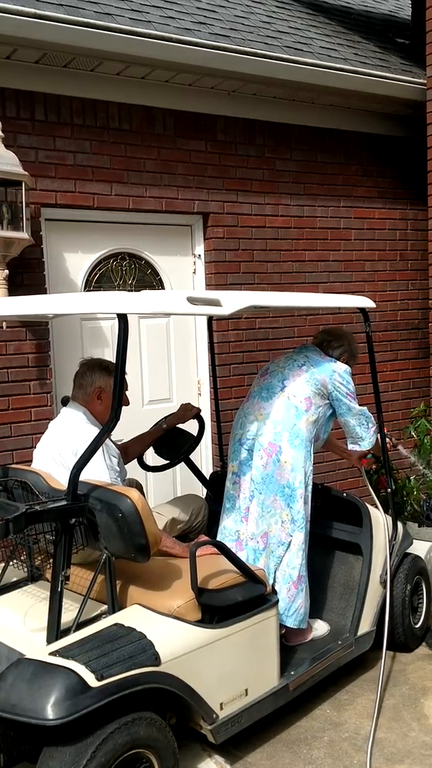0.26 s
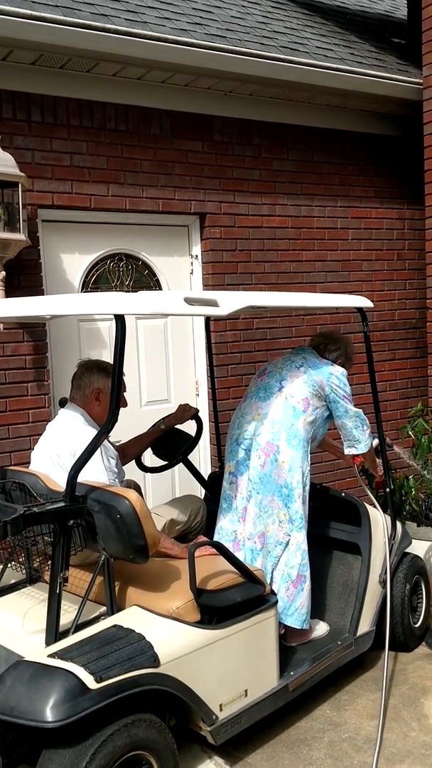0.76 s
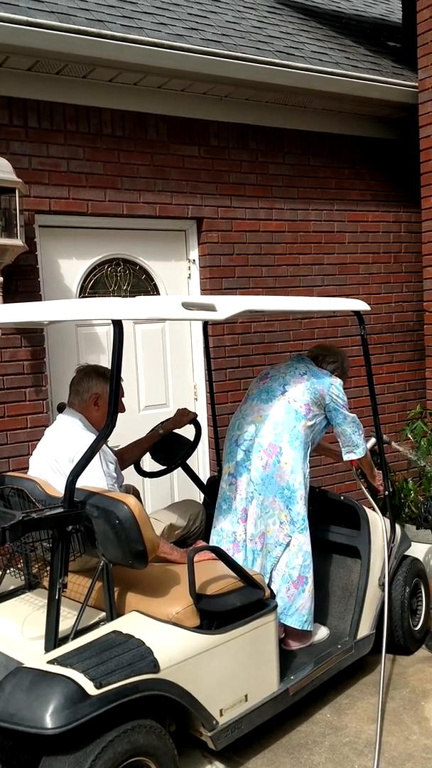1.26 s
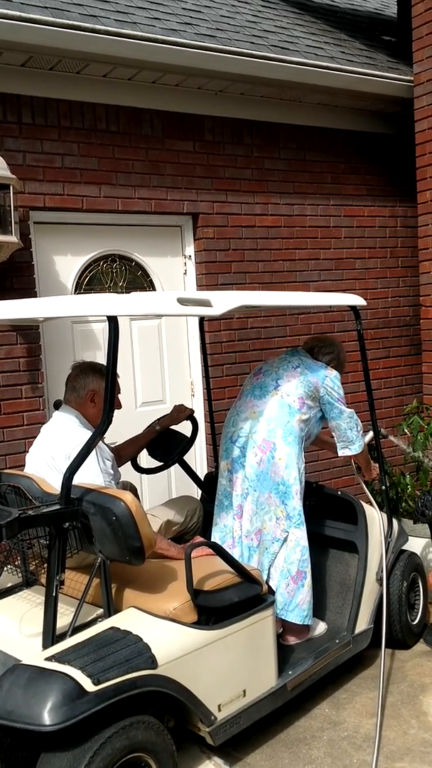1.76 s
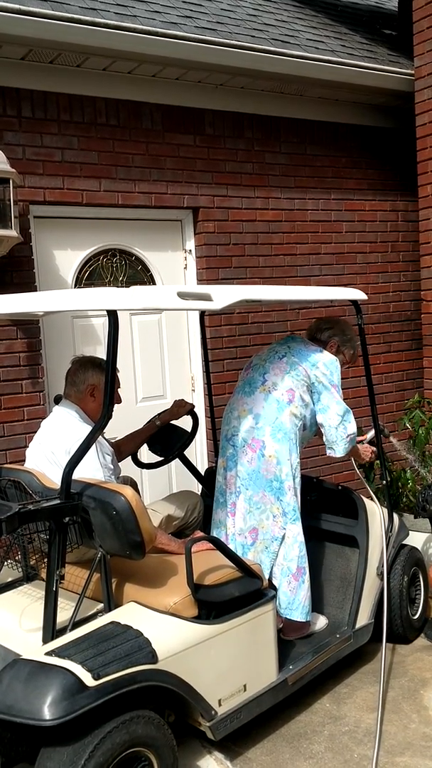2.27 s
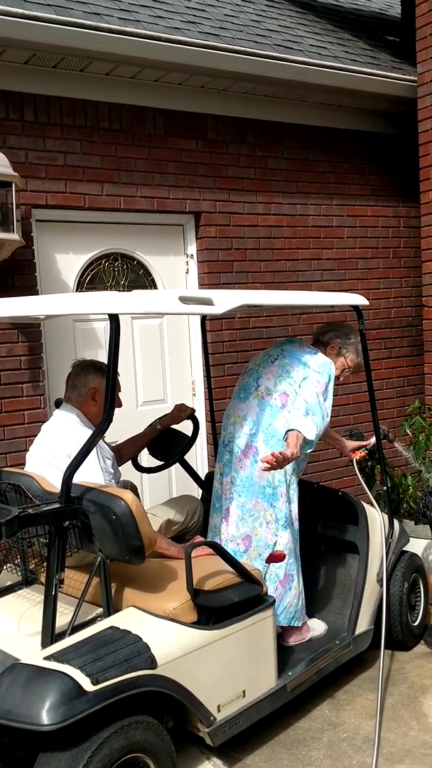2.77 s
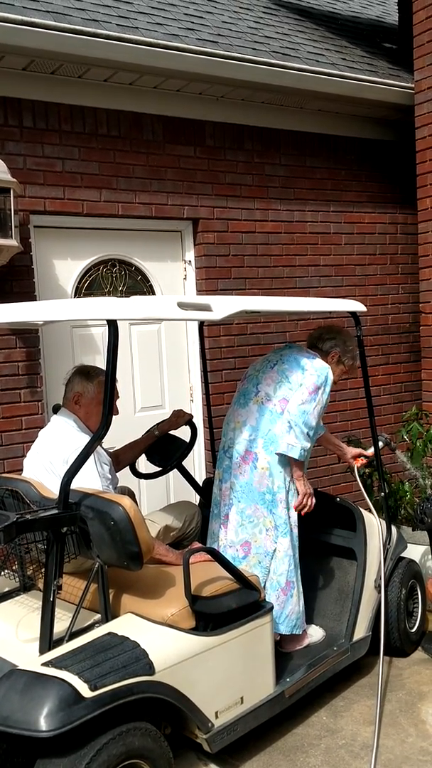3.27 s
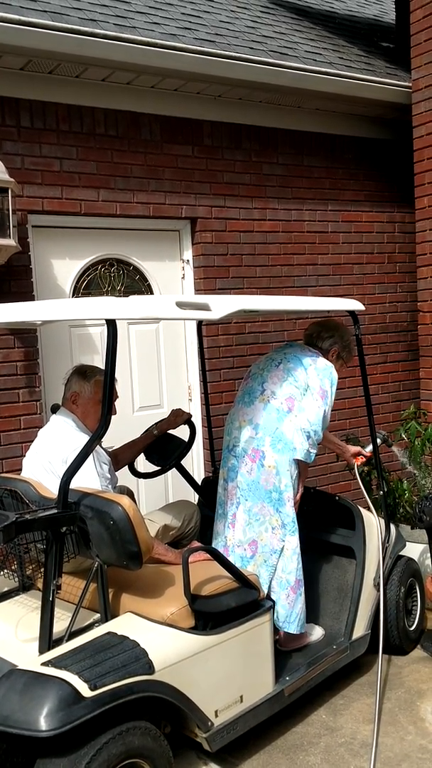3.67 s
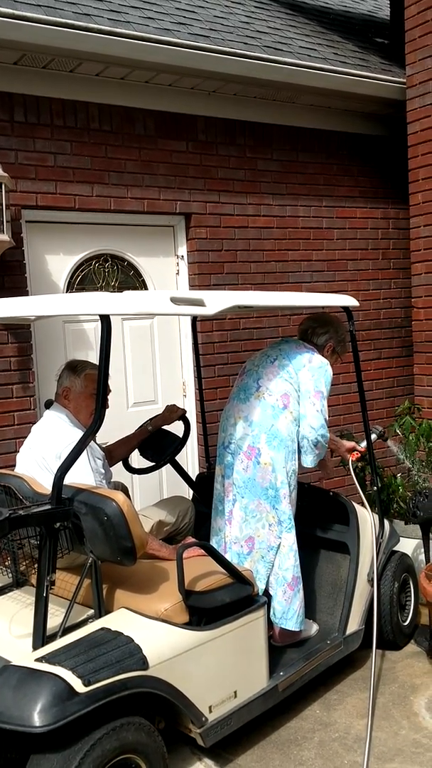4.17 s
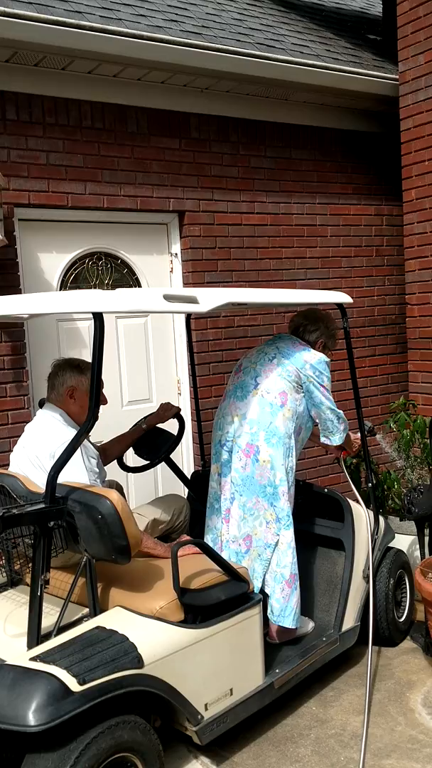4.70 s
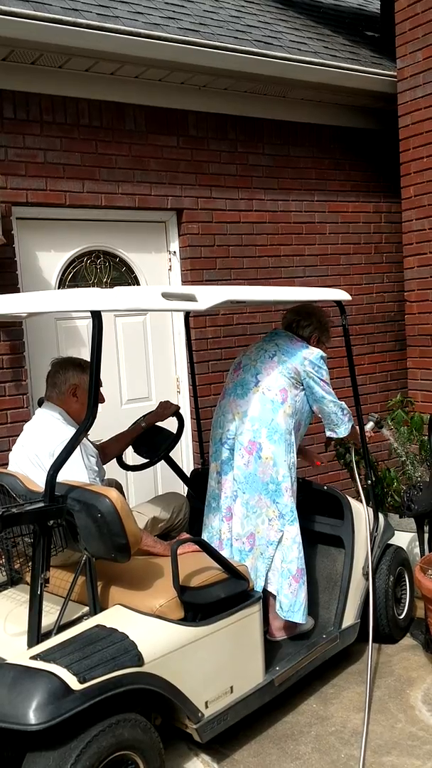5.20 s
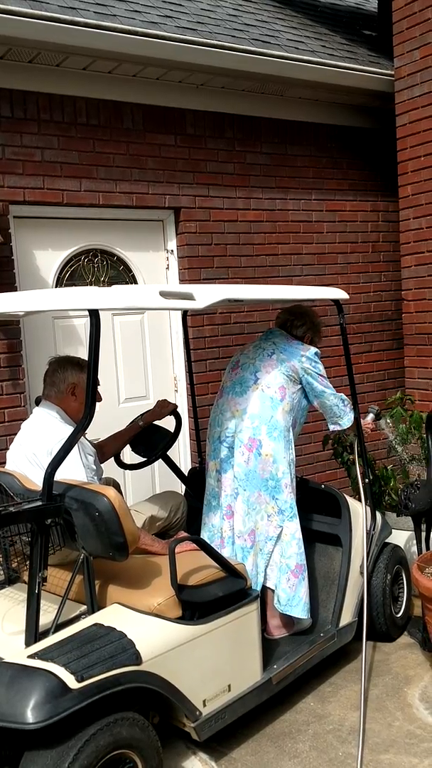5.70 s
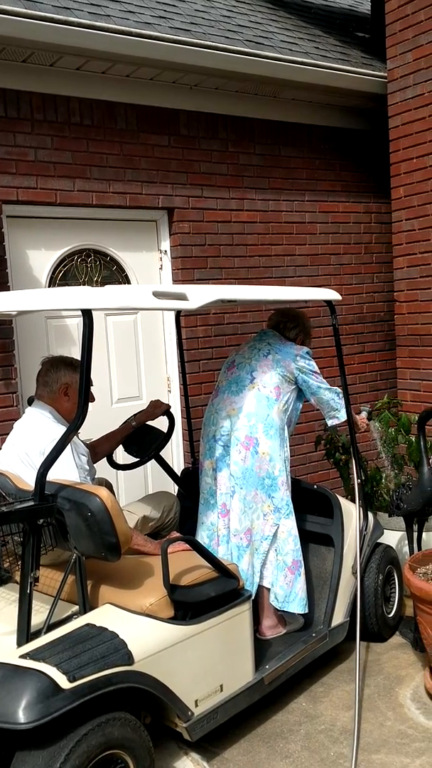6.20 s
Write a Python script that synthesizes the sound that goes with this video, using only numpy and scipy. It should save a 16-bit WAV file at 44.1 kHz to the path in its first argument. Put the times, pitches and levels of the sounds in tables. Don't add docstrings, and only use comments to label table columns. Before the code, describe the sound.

Steady bright water spray patters on potted plants outdoors, with low wind buffeting, scattered plops and ticks, and faint distant rumble.

```python
import sys
import numpy as np
from scipy import signal
from scipy.fft import rfft, irfft, next_fast_len
from scipy.io import wavfile
from scipy.ndimage import uniform_filter1d

SR = 44100
rng = np.random.default_rng(int(sys.argv[2]) if len(sys.argv) > 2 else 0)


def boost(x):
    u = np.asarray(x, float) / 20
    return 10 ** u


def master_out(mix):
    frames = np.transpose(np.atleast_2d(mix))
    ceiling = np.clip(frames, -1, 1)
    pcm = np.round(ceiling * 32767).astype(np.int16)
    wavfile.write(sys.argv[1], SR, pcm)


N = 284445
T = np.arange(N) / SR
PAD = next_fast_len(N + 4096)
HZ = np.arange(PAD // 2 + 1) * SR / PAD
CALM_DB = -66


def spray():
    # start_s, pot_and_soil_db, leaves_db
    jet = [(0, -46.5, -48), (.6, -45.5, -47), (1.15, -45.5, -48), (1.6, -46.5, -50), (1.92, -48.5, -51.5),
           (2.1, -43.5, -49), (2.3, -44, -46.5), (2.7, -46, -48), (3.0, -44.5, -45), (3.55, -45, -47.5),
           (3.9, -44.5, -48.5), (4.3, -44, -47), (4.8, -43.5, -47.5), (5.08, -44, -49), (5.55, -43.5, -49),
           (5.95, -40.5, -47.5), (6.12, -44.5, -47.5), (6.45, -43, -45.5)]
    # start_s, level_db
    flow = [(0.0, -37), (0.02, -37.5), (1.74, -36.5), (2.77, -37), (3.95, -37), (4.17, -38), (4.72, -36.5),
            (5.1, -37), (5.12, -36), (5.39, -37), (6.31, -37), (6.45, -35.5)]
    # freq_hz, left_db, right_db, likeness_0_1
    soil_colour = [(245, 3, 4.5, 1), (447, -3.5, -4.5, 1), (677, 5.5, 3.5, 0.96), (882, 10.5, 4.5, 0.72),
                   (1005, 3, 6, 1), (1450, -6.5, 9, 0.45), (2370, -9, 8, 0), (2750, -3, -6.5, 1),
                   (4320, -27, -23, 0.6)]
    ring_colour = [(500, -2, 1, 0.74), (880, -9.5, -10.5, 0.9), (1500, -7, 0.5, 0.83), (3200, -6.5, -7, 1),
                   (6000, -7.5, -1.5, 0.54), (10500, 3, -7, 0.8)]
    leaf_colour = [(1753, -13, 5.5, 0.18), (2220, 1.5, 8.5, 0.61), (3040, 3.5, 4.5, 0.53),
                   (4130, 6, 9.5, 0.35), (5420, -14, 2.5, 0.14), (6820, 10.5, -9.5, 0.24),
                   (8100, -17, -30, .2)]
    nozzle_colour = [(4470, -21, -14.5, 0.13), (6630, -15.5, -5.5, 0.3), (7240, -7, -4, 0.14),
                     (8880, -4, 1, 0.68), (10300, -5.5, 1.5, 0.18), (11900, -4, 2.5, 0.42),
                     (13000, -12, 3.5, .3), (15200, -3, -2.5, .2), (16500, -11, -10, .2)]
    soil_swing, leaf_swing = 1.34, 3.4
    ground_lag, nozzle_lag = 4.4, 18.6

    s, *columns = np.transpose(jet)
    soil_db, leaf_db = (np.interp(T, s, c) for c in columns)
    tremble = walk(14)
    on_leaf_db, on_pot_db = slaps()
    soil_db = soil_swing * soil_db + on_pot_db + 0.12 * tremble + 0.12 * walk(18)
    leaf_db = leaf_swing * leaf_db + on_leaf_db + 0.35 * tremble + 0.56 * walk(19)
    sputter_db = 0.5 * walk(21.97) + spits()
    flow_db = np.interp(T, *np.transpose(flow))

    def soil_hits():
        return drops(900, 2.4, 0.33) * boost(soil_db + 0.66 * walk(11))

    def ringing_drops():
        return patter(45, 17.0, 3.5) * boost(0.81 * soil_db)

    def leaf_hits():
        return drops(2500, 3.1, 0.41) * boost(0.51 * leaf_db + 0.36 * sputter_db + 0.9 * walk(9.7))

    def hiss():
        return drops(7000, 3.2, 0.33) * boost(flow_db + 0.44 * sputter_db + 0.59 * walk(40))

    soil = ports(soil_hits, soil_colour, lag=ground_lag)
    rings = ports(ringing_drops, ring_colour, lag=ground_lag)
    leaves = ports(leaf_hits, leaf_colour)
    nozzle = patchy(ports(hiss, nozzle_colour, lag=nozzle_lag), 7000, 14, 0.63)
    return level(rings, -49.5) + level(soil, -45) + level(leaves, -45.5) + level(nozzle, -33.5)


def spits():
    # start_s, extra_flow_db
    pockets = [(0.188, 2.1), (0.252, 0.5), (0.82, 5), (1.474, 4), (1.502, 3), (1.536, 4), (1.619, 8),
               (1.655, 7), (1.802, 7), (1.857, 8), (1.978, 7), (2.25, 3), (2.281, 0), (2.329, 2.5),
               (2.54, 2), (2.587, 2), (2.916, 2), (3.598, 2.1), (3.72, 0), (3.769, 8), (4.406, 2.8),
               (5.112, 1), (5.192, 9), (5.528, 0), (5.718, 9), (5.817, -4), (5.873, -2), (5.96, 2),
               (6.16, -1), (6.192, 5)]
    peak_ms = 6.3
    out = np.zeros(N)
    x = 1000 * np.arange(SR // 10) / SR / peak_ms
    for s, db in pockets:
        i = int(s * SR)
        out[i:i + len(x)] += db * x * np.exp(1 - x)
    return out


def slaps():
    # centre_s, extra_leaves_db, extra_pot_db
    hits = [(.03, 10, 1.1), (.18, 1, 1.1), (.3, 3, 1), (.5, 5, 3), (1.65, 4, 2), (2.21, 5, -0.5),
            (2.41, 4, -1), (2.55, 4, -2.5), (2.82, 4, 3), (3.65, 5, -1), (3.72, 9, 4), (4.0, 1, -3.5),
            (4.08, -5, -1), (4.95, 9, -3), (5.0, 2, 4.5), (5.14, -5, 3.5), (5.26, 8, .6), (5.45, 14, 1.5),
            (5.53, 1, 3), (5.78, 4, 1), (6.05, 8, 2), (6.16, 9, 1)]
    width_ms = 26.5
    out = np.zeros((2, N))
    for s, *extra_db in hits:
        i = slice(max(int((s - .1) * SR), 0), int((s + .1) * SR))
        out[:, i] += np.array(extra_db)[:, None] * np.exp(-(1000 * (T[i] - s) / width_ms) ** 2)
    return out


def drops(rate_hz, spread_db, share):
    size_db = np.minimum(spread_db * rng.exponential(size=N), 13)
    hit = (rng.random(N) < rate_hz / SR) * rng.choice([-1, 1], N) * boost(size_db)
    share = np.clip(share, 0, 1)
    return np.sqrt(1 - share) * rng.standard_normal(N) + np.sqrt(share) * level(hit, 0)


def patter(rate_hz, cycles, clump_db):
    out = 0
    for hz in np.geomspace(550, 10000, num=20) * (1 + 0.03 * rng.standard_normal(size=20)):
        when = np.flatnonzero(rng.random(N) < rate_hz / SR)
        hit = np.zeros(N)
        hit[when] = rng.standard_normal(len(when)) * boost(clump_db * walk(9)[when])
        pole = np.exp((2j * np.pi - 1 / cycles) * hz / SR)
        out = out + hz / 1000 * signal.lfilter([1], [1, -pole], hit).imag
    return out


def patchy(x, split_hz, rate_hz, spread_db):
    low = shape(x, 1 / (1 + (HZ / split_hz) ** 8))
    high = x - low
    return low * boost(spread_db * walk(rate_hz)) + high * boost(spread_db * walk(rate_hz))


def pot():
    # freq_hz, width_hz, level_db
    modes = [(632, 55, -1), (814, 200, -27), (1150, 19, 3), (1243, 10.5, 9.5)]
    high_modes = [(570, 6.7, 4), (1510, 48, -16), (1710, 50, -24), (1980, 46, -3), (2120, 23, 14)]
    # freq_hz, left_db, right_db, likeness_0_1
    pot_colour = [(283, -1, 2, 1), (600, 3.5, -8, 0.6), (1000, -9, -10, 0.96), (2430, -2, -5, 1)]
    # start_s, level_db
    drumming = [
        (4.6, -67),
        (5.0, -54),
        (5.5, -55),
        (5.78, -42),
        (5.9, -41),
        (6.02, -35),
        (6.1, -54.5),
        (6.45, -56),
    ]
    # start_s, peak_db, pitch_hz
    big_drops = [
        (0.31, -31, 1210),
        (2.989, -45, 1310),
        (3.678, -32, 1390),
        (4.219, -43, 930),
        (4.892, -43, 856),
        (4.97, -52, 923),
        (5.249, -36, 1460),
        (5.531, -29, 796),
        (6.149, -40, 821),
        (6.289, -36, 1420),
    ]
    # start_s, peak_db, pitch_hz
    cart_drops = [
        (.04, -27, 2060),
        (.30, -24.5, 1800),
        (.50, -33, 3080),
        (2.825, -30, 3080),
        (4.01, -28, 2220),
        (5.42, -26, 1840),
    ]
    decay_s = 0.0042

    ring = sum(boost(db) / (1 + 2j * (HZ - hz) / width) for hz, width, db in modes + high_modes)

    def rattle():
        return shape(drops(430, 2.3, 0.27) * boost(2.1 * walk(25)), ring)

    wall = ports(rattle, pot_colour, lag=1.4) * boost(np.interp(T, *np.transpose(drumming)))
    plops, age = np.zeros(N), np.arange(SR // 20) / SR
    for s, db, hz in big_drops + cart_drops:
        i = int(s * SR)
        rising = np.sin(2 * np.pi * hz * age * (1 + 6 * age))
        plops[i:i + len(age)] += boost(db - 6.0) * np.exp(-age / decay_s) * rising
    return wall + plops * boost(np.array([[-1.5], [.1]]))


def wind():
    # freq_hz, level_db
    rumble_colour = [(15, -50), (30, -18), (55, 10), (105, -11), (170, -2), (240, -12), (400, -42),
                     (600, -29)]
    # centre_s, level_db, pitch_hz
    puffs = [(0.016, -25.5, 117), (0.203, -32, 85), (0.395, -22, 106), (0.441, -27, 109), (0.469, -24, 101),
             (0.526, -19.5, 111), (0.576, -17, 141), (0.658, -24, 105), (0.71, -28, 109), (0.736, -31, 104),
             (0.775, -29, 78), (0.807, -26.5, 95), (2.249, -29, 103), (2.323, -37, 83), (2.879, -32, 82.5),
             (3.478, -33, 117), (3.658, -36, 83.4), (3.706, -36, 118), (3.737, -37, 74), (4.106, -22.5, 95),
             (4.41, -29.5, 133), (4.442, -26, 120), (4.613, -26.5, 106), (5.192, -25, 108),
             (5.332, -33, 106), (5.699, -23, 136), (5.78, -25, 111), (5.822, -27, 93), (5.908, -30, 93),
             (6.223, -36, 113)]
    # centre_s, level_db, pitch_hz
    sharp_puffs = [(0.353, -40, 128), (0.494, -22.5, 160), (.514, -27, 105), (.538, -27, 105),
                   (.56, -22, 130), (0.616, -30, 110), (4.049, -30, 103), (4.075, -27, 80),
                   (5.622, -30, 110), (5.66, -32, 245), (5.672, -20, 89), (5.724, -26, 100),
                   (5.86, -33, 100)]
    puff_ms, sharp_puff_ms = 19.6, 17.5
    eddy_glide, flicker_db = .4, 3.5

    rumble = level(shape(rng.standard_normal(N), boost(over_hz(rumble_colour)[0])), 8.9)
    out = rumble * gust() * boost(flicker_db * walk(40))
    eddies = [(*row, puff_ms) for row in puffs] + [(*row, sharp_puff_ms) for row in sharp_puffs]
    eddies += flutter()
    for (s, db, hz, ms), (start, glide) in zip(eddies, rng.random((len(eddies), 2))):
        i = slice(max(int((s - .1) * SR), 0), max(int((s + .1) * SR), 0))
        t = 1000 * (T[i] - s) / (ms - 8)
        slowing = 1 - eddy_glide * (glide - .3) * np.tanh(t)
        turn = 2 * np.pi * (start + hz * (T[i] - s) * slowing)
        swing = boost(db + 8.5) * np.exp(-(np.where(t < 0, 1.6, 1.05) * t) ** 2)
        sharp = np.clip(0.046 + 0.74 * swing, 0, .6)
        out[i] += swing * (np.sin(turn) + sharp * np.cos(2 * turn) - sharp ** 2 * np.sin(3 * turn))
    return np.array([out, 0.077 * np.roll(out, 60)])


def gust():
    # centre_s, peak_db, hold_s
    gusts = [
        (0.0, -36, 0.05),
        (0.53, -28.5, 0.15),
        (2.31, -54, .6),
        (3.6, -61, 0.28),
        (4.08, -49, 0.065),
        (4.426, -45, .04),
        (4.62, -49, .02),
        (5.195, -43, 0.018),
        (5.346, -52, .06),
        (5.754, -40, 0.18),
    ]
    rise_db_per_s, fall_db_per_s = 150, 175
    out = boost(CALM_DB)
    for s, db, hold in gusts:
        before = np.maximum(s - hold / 2 - T, 0)
        after = np.maximum(T - s - hold / 2, 0)
        out = out + boost(db - rise_db_per_s * before - fall_db_per_s * after)
    return out


def flutter():
    gap_s, base_db, spread_db, pitch_hz, length_ms = .13, -44.5, 2, 86, 24
    follow = 0.39
    slots = np.arange(0, N / SR, gap_s)
    shift, size, detune = rng.standard_normal((len(slots), 3)).T
    above_calm_db = 20 * np.log10(np.interp(slots, T, gust())) - CALM_DB
    level_db = base_db + spread_db * size + follow * above_calm_db
    centre_s = slots + 0.35 * gap_s * shift
    return [(s, db, pitch_hz * (1 + .15 * d), length_ms) for s, db, d in zip(centre_s, level_db, detune)]


def yard():
    # freq_hz, left_db, right_db, likeness_0_1
    traffic_colour = [(29.3, -9, -6, 0.51), (67, 5.5, 2.5, 1), (110, -11.5, -4.5, 0.96),
                      (160, -9.5, -6.5, 1), (263, -18, -17, 0.88), (393, -20, -24, 0.93),
                      (660, -27, -29, 0.26)]
    # start_s, level_db
    traffic_db = [(0, -44), (1.2, -42), (1.9, -46), (2.5, -42.5), (4, -43), (5, -40.5), (5.9, -40),
                  (6.02, -41.5), (6.45, -42.5)]
    # freq_hz, level_db
    hum_tones = [(107.7, -51), (236.9, -61), (296.1, -65.5), (409.1, -71)]
    swell_db = .7

    hum = sum(boost(db + 4.0 + 1.7 * walk(10)) * np.sin(2 * np.pi * (hz * T + rng.random()))
              for hz, db in hum_tones)
    traffic = ports(lambda: rng.standard_normal(N) * boost(swell_db * walk(2.96)), traffic_colour)
    return traffic * boost(np.interp(T, *np.transpose(traffic_db))) + hum


def ports(source, colour, lag=0.):
    left_db, right_db, alike = over_hz(colour)
    alike = np.clip(alike, 0, 1)
    direct, scattered = rfft(source(), PAD), rfft(source(), PAD)
    left = boost(left_db) * (alike * direct * late(lag) + np.sqrt(1 - alike ** 2) * scattered)
    right = boost(right_db) * direct
    return level(irfft(np.array([left, right]), PAD)[:, :N], 0)


def over_hz(table):
    hz, *columns = np.transpose(table)
    out = []
    for k, c in enumerate(columns):
        drop_db = 40 * (k < 2)
        out.append(np.interp(np.log(HZ + 1), np.log(hz), c, c[0] - drop_db, c[-1] - drop_db))
    return out


def shape(x, response):
    return irfft(rfft(x, PAD) * response, PAD)[..., :N]


def late(samples):
    return np.exp(-2j * np.pi * HZ * samples / SR)


def level(x, db):
    return x * boost(db) / np.sqrt(np.mean(x ** 2))


def walk(rate_hz):
    k = int(SR / rate_hz)
    held = np.repeat(rng.standard_normal(N // k + 1), k)
    w = uniform_filter1d(uniform_filter1d(held, k), k)[:N]
    return w / w.std()


def scene():
    return spray() + pot() + wind() + yard()


def band_limit(x):
    return signal.sosfilt(signal.butter(12, 16120, fs=SR, output="sos"), x)


def record(dry):
    steer_lag = 20.5
    steer_top_hz, steer_fade_hz = 7220, 517
    rumble_cut_hz, top_hz = 44, 15740
    port_wander_db = .8

    steer = late(steer_lag) / (1 + np.exp(np.clip((HZ - steer_top_hz) / steer_fade_hz, -30, 30)))
    cut = (HZ < top_hz) / (1 - 1j * rumble_cut_hz / (HZ + 1)) ** 3
    steered = dry - boost(port_wander_db * walk(5)) * shape(dry[::-1], steer)
    return band_limit(shape(steered, cut))


dry = scene()
out = record(dry)
master_out(out)
```